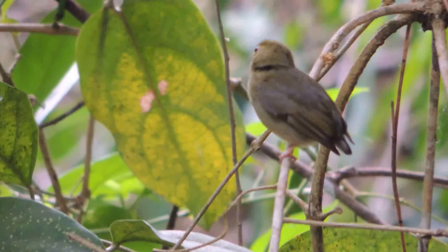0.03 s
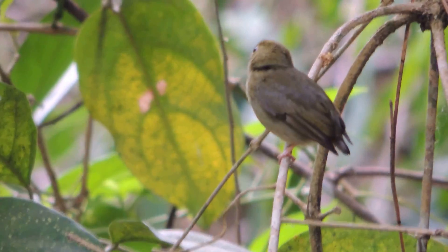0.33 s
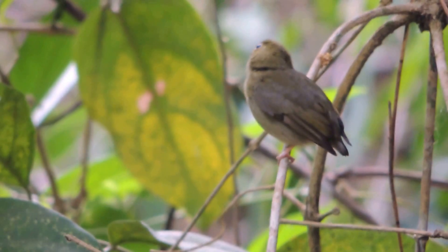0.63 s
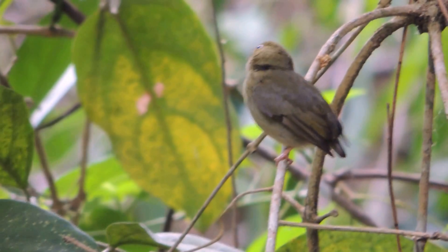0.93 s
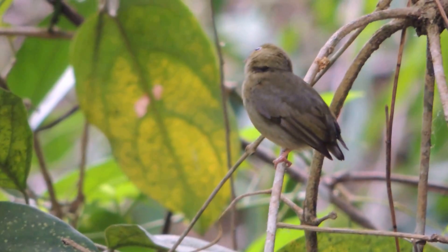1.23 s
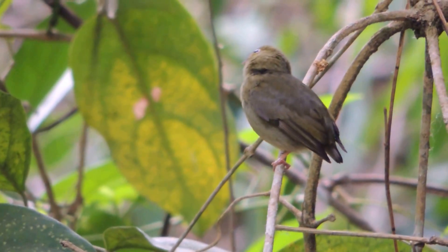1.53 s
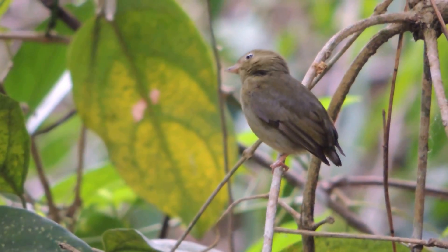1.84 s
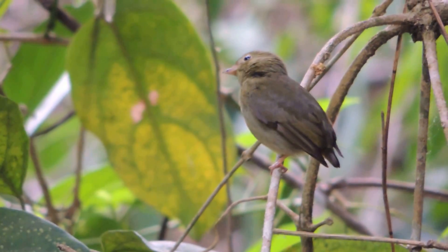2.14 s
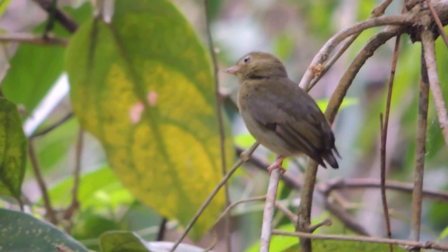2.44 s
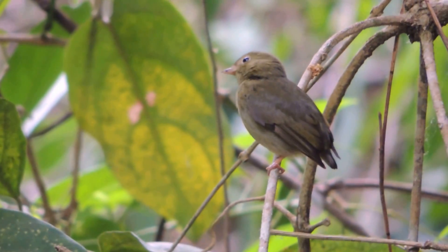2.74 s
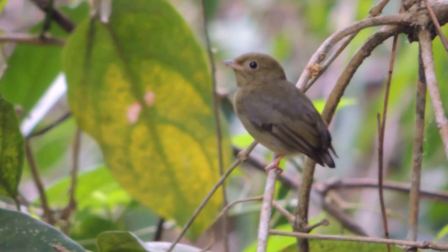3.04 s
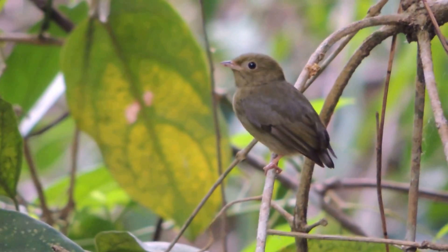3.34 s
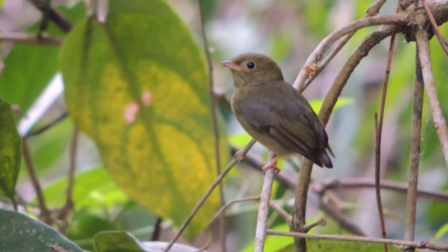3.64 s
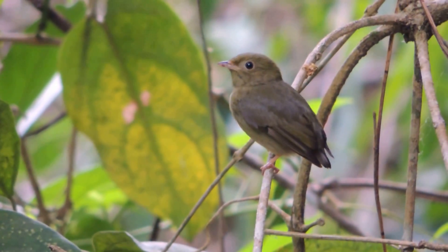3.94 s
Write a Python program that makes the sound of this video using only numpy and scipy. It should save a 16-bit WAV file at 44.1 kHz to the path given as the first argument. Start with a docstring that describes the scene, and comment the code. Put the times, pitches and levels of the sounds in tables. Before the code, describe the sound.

A cricket trills, pauses briefly and starts again, its pitch slowly climbing. A bird gives one rising whistle among the trees, others chirp far off, and drops plop softly on leaves. The forest sounds sit to the right.

```python
"""In forest undergrowth, near a cricket that trills with its wings, pauses and starts again,
its pitch climbing as it gathers strength. Among the trees a bird gives one rising whistle,
others chirp far off, and drops plop softly on leaves over a distant wash of foliage and insects.
The forest reaches almost only the right microphone; the left holds hiss and a low rumble."""
import sys
import numpy as np
from scipy import signal
from scipy.fft import rfft, irfft, next_fast_len
from scipy.io import wavfile
from scipy.ndimage import uniform_filter1d, map_coordinates

SR = 44100
rng = np.random.default_rng(int(sys.argv[2]) if len(sys.argv) > 2 else 0)


def unload_wav(signal):
    """Save mono or channel-first audio to the path in sys.argv[1] as 16-bit WAV at rate SR, clipped to [-1, 1]."""
    wavfile.write(
        sys.argv[1],
        SR,
        np.round(np.clip(np.atleast_2d(signal).T, -1, 1) * 32767).astype(np.int16),
    )


N = 176400


def amp(db):
    """Decibels to gain."""
    return 10 ** (np.asarray(db) / 20)


def wobble(rate):
    """A smooth random curve with `rate` knots a second."""
    knots = rng.standard_normal(int(N * rate / SR) + 4)
    return map_coordinates(knots, [np.arange(N) * rate / SR])


def glide(hz):
    """A sine that follows a pitch curve."""
    return np.sin(2 * np.pi * np.cumsum(hz) / SR)


def filtered(x, response):
    """Shape x with a gain that depends on frequency."""
    size = next_fast_len(N + SR // 2)
    return irfft(rfft(x, size) * response(np.fft.rfftfreq(size, 1 / SR)), size)[..., :N]


def noise(spectrum):
    """Steady noise through the given (Hz, dB per Hz) points."""
    points_hz, db = np.transpose(spectrum)
    white = rng.standard_normal(N) * np.sqrt(SR / 2)
    return filtered(white, lambda hz: amp(np.interp(np.log(hz + 1), np.log(points_hz), db)))


def add(track, start_s, sound):
    """Mix a sound into the track at start_s."""
    part = track[max(0, round(start_s * SR)):][:len(sound)]
    part += sound[:len(part)]


def trees(x, wet_db, t60):
    """Diffuse echo off leaves and trunks; the total power stays the same."""
    t = np.arange(SR) / SR
    tail = rng.standard_normal(SR) * amp(-60 * t / t60) * (t > .003)
    wet = signal.fftconvolve(x, tail / np.linalg.norm(tail))[:N]
    return (x + amp(wet_db) * wet) / np.hypot(1, amp(wet_db))


# The noise floor. Each row: frequency in Hz, level in dB per Hz.
HISS_SPECTRUM = [(20, -95), (100, -88), (400, -90), (1000, -94), (2000, -97), (4000, -98), (8000, -100.7),
                 (14000, -100.3)]
def hiss():
    """Each microphone channel has a steady hiss of its own."""
    return np.array([noise(HISS_SPECTRUM), noise(HISS_SPECTRUM)])


# The low background. Each row: frequency in Hz, level in dB per Hz.
RUMBLE_SPECTRUM = [(10, -77), (29, -71.5), (42, -76.5), (70, -80.5), (130, -83), (250, -88.5), (600, -97),
                   (2000, -115)]
def rumble():
    """A deep, steady rumble, the same at both microphones."""
    return noise(RUMBLE_SPECTRUM)


# The forest in the distance. Each row: frequency in Hz, level in dB per Hz.
FOREST_SPECTRUM = [(30, -95), (150, -91), (400, -88), (1100, -89.5), (2000, -90), (3700, -91), (5000, -94),
                   (6000, -86.5), (6700, -88.5), (7600, -92.5), (8600, -99), (10500, -100.5),
                   (14000, -100.5)]
def forest_wash(patchy_db=2.12, swell_db=0.95):
    """Far leaves and insects blend into a wash that shifts in patches of pitch and time."""
    grid = signal.stft(np.zeros(N), nperseg=512)[2].shape
    patches = uniform_filter1d(rng.standard_normal(grid), size=5, axis=0)  # across frequency
    patches = uniform_filter1d(patches, size=18, axis=1)  # across time
    steady = signal.stft(noise(FOREST_SPECTRUM), nperseg=512)[2]
    wash = signal.istft(steady * amp(patchy_db * patches / patches.std()), nperseg=512)[1][:N]
    return wash * amp(swell_db * wobble(rate=2.71))


def patter(count, softest_db=-56, centre_hz=1480, decay_s=.004):
    """Small drops ring on leaves at random, barely above the wash."""
    out, t = np.zeros(N), np.arange(SR // 25) / SR
    for when, tone, size in rng.random((count, 3)):
        hz = centre_hz * 2 ** (2 * tone - 1)  # up to an octave either way
        ring = np.exp(-t / decay_s) * np.sin(2 * np.pi * hz * t)
        add(out, when * N / SR, amp(softest_db + 10 * size) * ring)
    return out


# Larger drops. Each row: start in seconds, ring pitch in Hz, level in dB, length in seconds.
LEAF_DROPS = [(.104, 1065, -46, 0.017), (0.107, 1540, -46, 0.01), (0.258, 1110, -49, .012),
              (.57, 1553, -43, .016), (0.928, 700, -41, 0.023), (1.563, 918, -36, 0.024),
              (1.576, 1053, -46, 0.023), (1.957, 660, -49, 0.022), (2.14, 1110, -37.5, 0.017),
              (3.007, 1096, -46, .014), (3.013, 1476, -47.5, 0.018), (3.973, 1304, -44, 0.019)]
def drops(attack_s=0.00049, tick_db=-22, tick_s=.002, rise_per_s=2):
    """Each drop strikes a leaf with a faint tick and a short hollow ring that bends upward."""
    out, t = np.zeros(N), np.arange(SR // 10) / SR
    for start, hz, db, length in LEAF_DROPS:
        envelope = (1 - np.exp(-t / attack_s)) * np.exp(-2 * (t / length) ** 2)
        ring = envelope * np.sin(2 * np.pi * hz * t * (1 + rise_per_s * (t - length) / 2))
        dull_noise = signal.lfilter([.5], [1, -.7], rng.standard_normal(len(t)))
        tick = amp(tick_db) * np.exp(-t / tick_s) * dull_noise
        add(out, start, amp(db) * (ring + tick))
    return out


# Birds far from the microphone. Each row: start and length in seconds, first and last pitch in Hz,
# level in dB, depth of the pitch flutter in Hz.
FAR_CHIRPS = [(.308, .036, 7300, 6300, -43, 40), (.347, 0.023, 8100, 8950, -46, 60),
              (.365, 0.086, 8900, 8800, -55, 520), (0.591, .045, 3250, 3750, -51, 90),
              (0.738, 0.16, 9300, 9550, -53.5, 190), (0.755, 0.066, 6700, 6430, -49, 332),
              (0.778, .06, 4670, 4420, -53, 380), (0.836, 0.029, 7400, 6700, -45, 200),
              (0.871, 0.058, 6550, 6690, -44, 150), (1.044, 0.2, 4600, 4240, -50, 330),
              (1.248, 0.24, 4030, 3830, -51.5, 400), (1.933, 0.06, 6700, 6400, -50, 250),
              (2.005, 0.12, 4870, 4760, -44.5, 416), (2.07, 0.07, 4340, 4370, -46, 70),
              (2.096, .08, 7090, 7230, -50.5, 130), (2.127, 0.067, 6700, 6500, -51, 450),
              (2.403, .07, 4450, 4530, -57, 49.43), (2.667, 0.11, 3580, 3800, -55, 80),
              (2.802, 0.21, 7600, 7800, -58, 180), (3.158, 0.14, 3990, 4390, -51.5, 330),
              (3.32, .13, 8300, 8600, -58, 200), (3.742, 0.073, 2620, 2562, -55, 60)]
def bird_chirps():
    """Glides that swell and fade; a fast flutter of pitch turns some into rasps."""
    out, flutter = np.zeros(N), wobble(rate=900)
    for start, length, first_hz, last_hz, db, rasp_hz in FAR_CHIRPS:
        progress = np.linspace(0, 1, int(length * SR))
        rasp = rasp_hz * np.roll(flutter, -round(start * SR))[:len(progress)]
        hz = first_hz + (last_hz - first_hz) * progress + rasp
        swell = np.sqrt(np.abs(np.sin(np.pi * progress)))
        add(out, start, amp(db) * swell * glide(hz))
    return out


# One bird's whistle among the trees. Each row: time in seconds, pitch in Hz, level in dB.
WHISTLE_CONTOUR = [(1.873, 3480, -58), (1.909, 3666, -44), (1.943, 3820, -35), (1.991, 3860, -36.5),
                   (2.026, 4005, -34.5), (2.06, 3960, -45), (2.109, 4047, -41), (2.171, 3923, -41),
                   (2.24, 3837, -47)]
def bird_whistle(waver=.014):
    """One note that rises and levels off, slightly hoarse from a fast waver of pitch."""
    times, hz, db = np.transpose(WHISTLE_CONTOUR)
    t = np.arange(N) / SR
    pitch = np.interp(t, times, hz) * (1 + waver * wobble(rate=350))
    return amp(np.interp(t, times, db, left=-120, right=-120)) * glide(pitch)


# The swell of one wing stroke. Each row: fraction of the stroke gone by, relative amplitude.
STROKE_ENVELOPE = [(.03, 0), (.15, 0.65), (.33, 0.93), (.5, 0.61), (.63, 0.38), (.8, 0.35), (.97, 0)]
def wing_stroke(top_hz, db, length_s=0.014, slows_from=0.37, end_hz=5220, scatter_db=1.3):
    """A short tone that holds its pitch, then slides down as the cricket's wing slows."""
    progress = np.linspace(0, 1, int(length_s * SR))
    envelope = np.interp(progress, *np.transpose(STROKE_ENVELOPE))
    envelope = uniform_filter1d(envelope, size=44, mode="constant")  # round the corners
    slowing = np.clip((progress - slows_from) / (1 - slows_from) * 1.11, 0, 1)
    whole_db, tail_db = scatter_db * rng.standard_normal(2)
    gain = 2 * amp(db + whole_db + 2 * tail_db * slowing)
    return gain * envelope * glide(top_hz + (end_hz - top_hz) * slowing)


# The nearby cricket, before and after its pause.
# Each row: time in seconds, wing strokes per second, pitch in Hz, level in dB.
SHORT_TRILL = [(.036, 69, 5850, -39), (.16, 67, 5860, -40), (.228, 62, 5830, -41.5)]
LONG_TRILL = [(.982, 60, 5530, -45), (1.045, 66, 5520, -45.5), (1.06, 70.4, 5500, -50),
              (1.1, 73.94, 5566, -45), (1.6, 73.4, 5580, -45), (1.72, 73.16, 5650, -42),
              (2.35, 71.4, 5707, -42), (2.8, 72.07, 5814, -40.5), (3.3, 71.65, 5880, -40),
              (4.0, 70.26, 5876, -40)]
def cricket(jitter_s=.0003, scatter_hz=20):
    """Two trills, each a fast run of wing strokes, slightly uneven in time and pitch."""
    out = np.zeros(N)
    for trill in (SHORT_TRILL, LONG_TRILL):
        times, rate, pitch, level = np.transpose(trill)
        t = np.arange(round(times[0] * SR), round(times[-1] * SR)) / SR
        strokes_done = np.floor(np.cumsum(np.interp(t, times, rate)) / SR)
        for start in t[np.diff(strokes_done, prepend=-1) > 0]:
            top_hz = np.interp(start, times, pitch) + rng.normal(0, scatter_hz)
            stroke = wing_stroke(top_hz, db=np.interp(start, times, level))
            add(out, start + rng.normal(0, jitter_s), stroke)
    return out


def scene():
    """Animals, drops and wash lie far to the right, over a rumble common to both sides."""
    insect = trees(cricket(), wet_db=-8.5, t60=0.034)  # close reflections
    insect = trees(insect, wet_db=-9.0, t60=1.3)  # the wider forest
    whistle = trees(bird_whistle(), wet_db=0.5, t60=1.0)
    chirps = trees(bird_chirps(), wet_db=1.5, t60=0.75)
    dripping = trees(drops() + patter(count=36), wet_db=-9.5, t60=.3)
    events = (insect + whistle + chirps + dripping) * amp([[-43], [0]])  # left, right in dB
    wash = forest_wash() * amp([[-32], [0]])
    return rumble() + wash + events


def record(dry, silent_until_s=.036, top_hz=14250):
    """The sound begins after a brief silence, with hiss added and nothing above the band limit."""
    live = (dry + hiss()) * (np.arange(N) / SR > silent_until_s)
    return filtered(live, lambda hz: hz < top_hz)


dry = scene()
out = record(dry)
unload_wav(out)
```